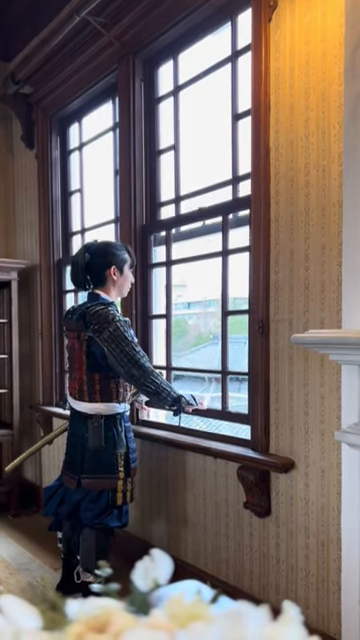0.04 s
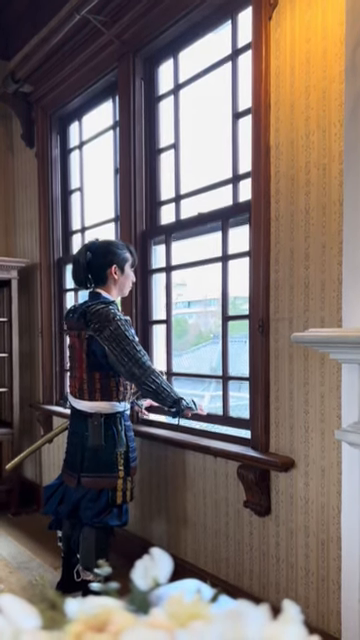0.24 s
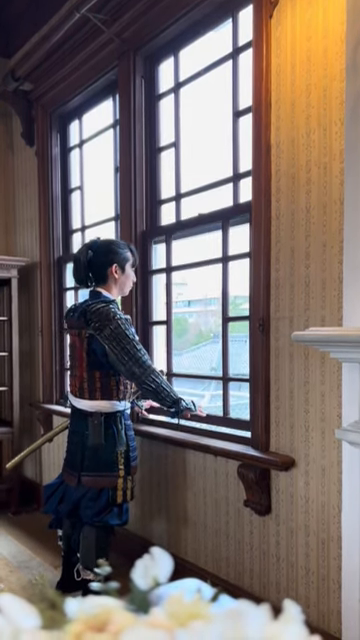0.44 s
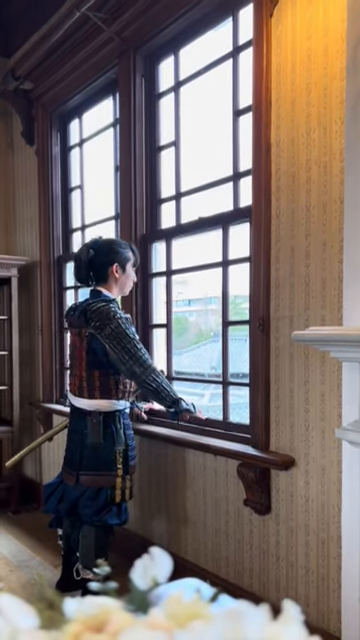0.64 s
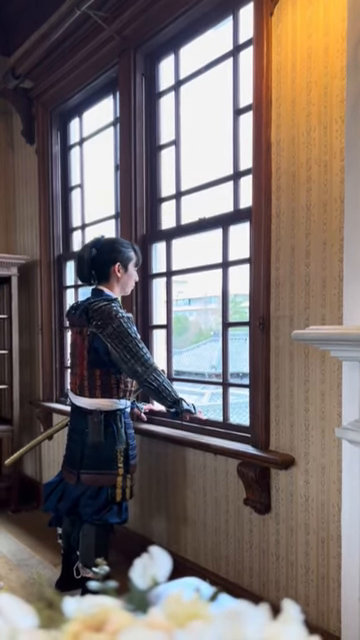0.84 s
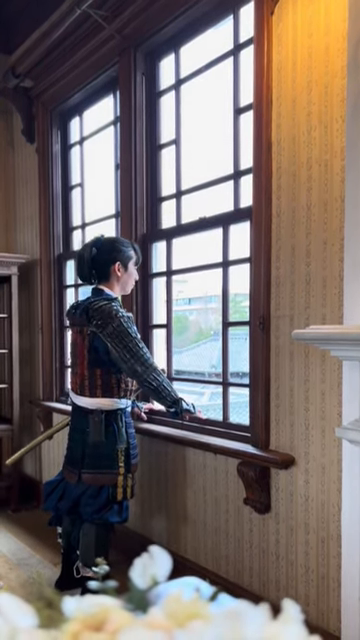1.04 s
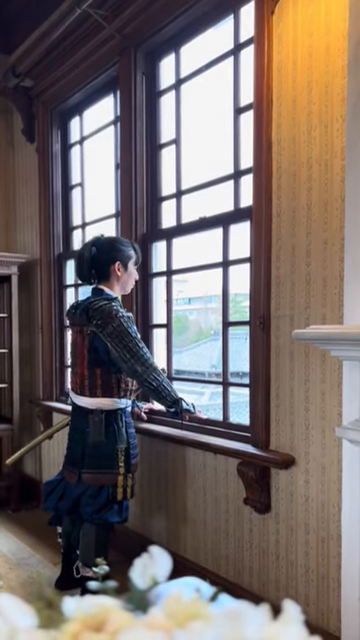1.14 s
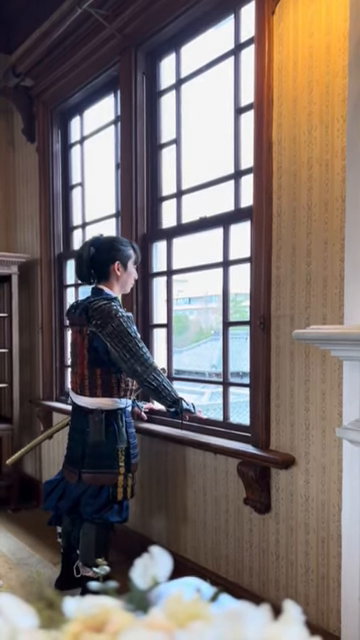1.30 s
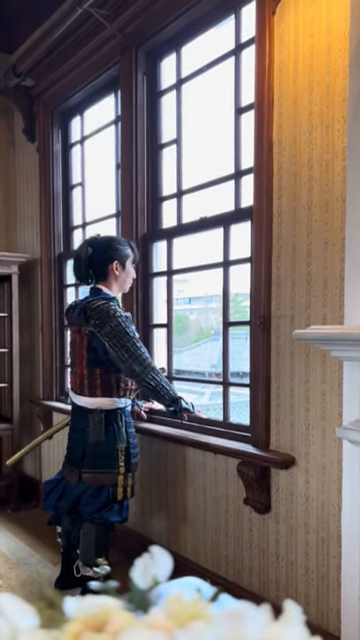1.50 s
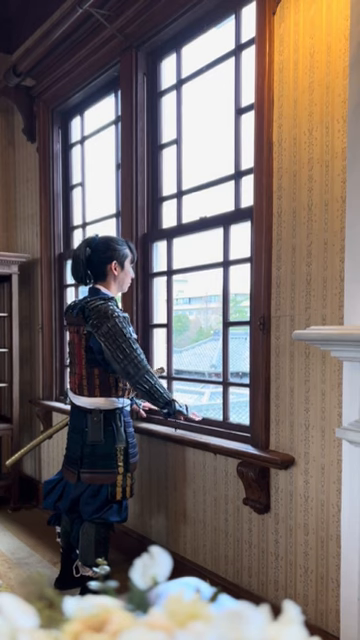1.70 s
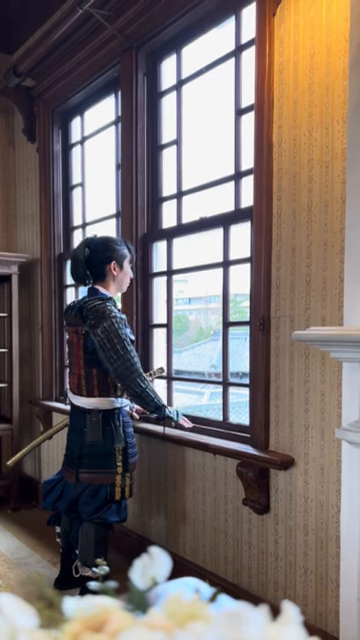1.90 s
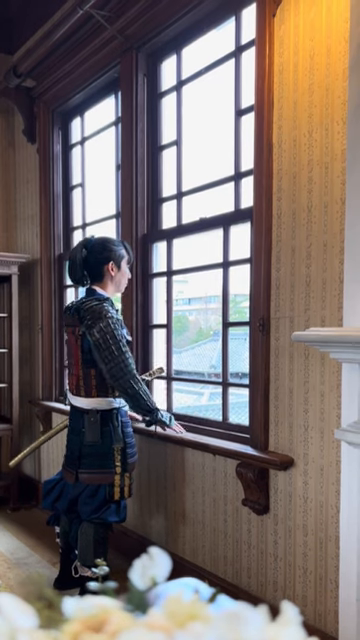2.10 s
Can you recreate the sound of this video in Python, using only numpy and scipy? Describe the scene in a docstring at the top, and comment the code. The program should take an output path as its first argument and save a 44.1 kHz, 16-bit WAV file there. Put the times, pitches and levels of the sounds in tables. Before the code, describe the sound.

A wooden sash window slides down with clacks and a rasping squeak, then thuds shut.

```python
"""Shutting a wooden sash window

In a quiet room the sash rumbles down its channel and clacks sideways against the frame. It binds, and
wood sticking and slipping on wood gives a rasping squeak. It lands with a low thud that sets sash, sill
and wall ringing. Then a hand lets go, a sleeve rustles and a bird chirps faintly outside."""
import sys
import numpy as np
from scipy import signal
from scipy.fft import rfft, irfft
from scipy.io import wavfile
from scipy.ndimage import uniform_filter1d

SR = 44100
rng = np.random.default_rng(int(sys.argv[2]) if len(sys.argv) > 2 else 0)


def store_wav(level_fs):
    """Save 16-bit WAV to argv[1]."""
    pcm = np.round(np.clip(np.atleast_2d(level_fs), -1, 1) * 32767)
    wavfile.write(sys.argv[1], SR, pcm.T.astype(np.int16))


N = 94815
T = np.arange(N) / SR
BIN_HZ = np.arange(N + 1) * SR / (2 * N) + 1
LEFT_RIGHT = np.array([[1], [-1]])

# stick-slip of the binding sash (time [s], pitch [Hz], level [dB], left minus right [dB])
STICK_SLIP = [(0.42, 856.2, -41.5, -7), (0.428, 780, -29, -8.5), (0.436, 825, -42, -4.0),
              (0.454, 837, -29, -4.5), (0.458, 773.6, -30, -3), (0.482, 784.4, -31.5, -7),
              (0.49, 725.7, -33.5, -16), (0.524, 731.7, -29, -6.0), (0.54, 760, -26, -6),
              (0.56, 756, -29, -2.5), (0.572, 821.6, -24.5, -4.5), (0.618, 802.2, -45.5, -4.0),
              (0.632, 873, -40, 4), (0.656, 827.4, -31.5, 5), (0.672, 846, -32.5, -2),
              (0.706, 838, -53, 4.5), (0.716, 876, -44.5, -3.5), (0.74, 849, -54.5, -2)]


def undb(db):
    return 10 ** (np.asarray(db) / 20)


def unit(x):
    return x / np.sqrt(np.mean(x ** 2) + 1e-20)


def noise():
    return rng.standard_normal(N)


def curve(rows, column=1):
    """One column of a table, joined by straight lines in time."""
    rows = np.array(rows)
    return np.interp(T, rows[:, 0], rows[:, column])


def at(points, hz):
    """A table over frequency, read on a log axis."""
    points = np.array(points)
    return np.interp(np.log(np.maximum(hz, 1)), np.log(points[:, 0]), points[:, 1])


def colour(x, spectrum):
    """Filter by a spectrum that falls steeply beyond its ends; rms 1."""
    low_cut = 1 + (spectrum[0][0] / BIN_HZ / 1.3) ** 6
    high_cut = 1 + (BIN_HZ / spectrum[-1][0] / 1.3) ** 6
    return unit(irfft(rfft(x, 2 * N) * undb(at(spectrum, BIN_HZ)) / low_cut / high_cut)[:N])


def walk(rate_hz):
    """Smooth random wandering; rms 1."""
    span = max(int(SR / rate_hz), 1)
    return unit(uniform_filter1d(uniform_filter1d(noise(), span), span))


def burst(start, rise, fall):
    """Smooth attack, then exponential decay; times in seconds."""
    age = np.maximum(T - start, 0)
    return np.sin(np.pi / 2 * np.minimum(age / rise, 1)) ** 2 * np.exp(-np.maximum(age - rise, 0) / fall)


def arch(start, length):
    return np.sin(np.pi * np.clip((T - start) / length, 0, 1))


def phase_of(hz):
    return 2 * np.pi * np.cumsum(hz) / SR


def grains(per_s, spread_db):
    """Random tiny slips of unequal size."""
    ticks = (rng.random(N) < per_s / SR) * np.sign(noise())
    return unit(ticks * undb(spread_db * np.clip(noise(), -2, 2)))


def spread(mid, side, hz):
    """Two close microphones: alike in the bass, unrelated well above 300 Hz."""
    width = hz ** 2 / (hz ** 2 + 300 ** 2)
    return (mid + width * side * LEFT_RIGHT) / np.sqrt(1 + width * width)


def diffuse(spectrum, width_at_hz):
    """Coloured noise from all round, as wide as the room is at one frequency."""
    return spread(colour(noise(), spectrum), colour(noise(), spectrum), width_at_hz)


def wide(mid, side, side_db=-7.5):
    """Grit from both sides of the frame, partly unlike left and right."""
    return mid + undb(side_db) * side * LEFT_RIGHT


def room_tone():
    """A faint, low bed of air that sways in level."""
    # still room (frequency [Hz], relative level [dB])
    spectrum = [(15, -57), (25, -27.5), (48, -11.5), (82, 4), (122, -18.5), (156, -11), (253, -27.5),
                (340, -26.5), (389, -49.5), (445, -34.5), (495, -49), (1450, -44), (15500, -56.5)]
    return diffuse(spectrum, width_at_hz=60) * undb(-61 + 2 * walk(12))


def room_tail():
    """Reverb in octave bands; the lows last longest, the bass below 85 Hz leaks away."""
    # room decay (frequency [Hz], t60 [s])
    decay = [(60, .9), (150, 0.54), (400, .62), (1000, 0.56), (3000, 0.53), (6000, 0.38), (14000, .24)]
    mid, side = rfft(noise(), 2 * N), rfft(noise(), 2 * N)
    out = 0
    for hz in 62.5 * 2 ** np.arange(9):
        band = np.cos(np.pi / 2 * np.clip(np.log2(BIN_HZ / hz), -1, 1)) ** 2 / (1 + (85 / BIN_HZ) ** 2)
        wash = spread(irfft(mid * band)[:N], irfft(side * band)[:N], hz)
        fade = burst(.0012, rise=.003, fall=at(decay, hz) / np.log(1000))
        out = out + wash * fade / np.sqrt(np.sum(fade ** 2))
    return out


def bird():
    """Faint arched, fluttering whistles from outside."""
    # chirps (time [s], length [s], pitch [Hz], pitch lift [Hz], level [dB])
    chirps = [(1.153, 0.095, 3300, 419, -75), (1.208, .045, 3310, 59.4, -80),
              (1.233, 0.045, 3405, 281, -80), (2.045, 0.12, 3410, 68, -72.5)]
    flutter_db, warble_hz = 1.5, 45.3
    out = 0
    for start, length, hz, lift, db in chirps:
        swell = arch(start, length)
        level = undb(db + flutter_db * walk(120)) * swell
        out = out + level * np.sin(phase_of(hz + lift * swell + warble_hz * walk(250)))
    return out


def sleeve():
    """The hand leaves the sash with a dull rub while the cloth swishes."""
    # hand rub (time [s], level [dB])
    rub_levels = [(1.60, -100), (1.64, -64.5), (1.70, -64.5), (1.755, -56.5), (1.79, -66), (1.86, -65.5),
                  (1.92, -74.5), (2.15, -87)]
    # dull skin on wood (frequency [Hz], relative level [dB])
    rub_spectrum = [(71, -29.5), (120, 5), (295, -1.5), (409, -1), (527, -15.5), (1210, -26), (1500, -30.5),
                    (1950, -59.5), (3300, -120)]
    # cloth strokes (time [s], length [s], level [dB])
    strokes = [(1.597, 0.23, -81.5), (1.776, 0.17, -73.5), (1.899, 0.28, -78)]
    # airy cloth (frequency [Hz], relative level [dB])
    cloth_spectrum = [(700, 3.5), (1500, -5), (2300, -2), (3200, -9), (4500, -1.5), (5400, -12), (7000, -8),
                      (9500, -20), (15000, -18.5)]
    rub = diffuse(rub_spectrum, width_at_hz=352) * undb(curve(rub_levels))
    swells = sum(undb(db) * arch(start, length) for start, length, db in strokes)
    return rub + diffuse(cloth_spectrum, width_at_hz=1500) * swells * undb(2.65 * walk(70))


def wall_boom():
    """After the landing, the wall's many low modes die away slowly."""
    # wall bass (frequency [Hz], relative level [dB])
    spectrum = [(30, -26.5), (42, -4.5), (55, 3.5), (72, -8), (95, 2.5), (135, -1.5), (220, -12),
                (400, -24), (900, -60.5)]
    return diffuse(spectrum, width_at_hz=50) * undb(-27.5) * burst(.797, rise=.03, fall=.13)


def slide():
    """The heavy sash rumbles and hisses along its channel."""
    # travel of the sash (time [s], rumble [dB], hiss [dB])
    travel = [(0, -39.5, -51.5), (.06, -42.5, -52.5), (.15, -46.5, -52.5), (.24, -39, -51.5),
              (.28, -31, -52.5), (.36, -35, -53), (.45, -40.5, -45.5), (.56, -47, -47), (.68, -55, -53),
              (.73, -36.5, -49), (.78, -42, -48), (.84, -83, -81)]
    # weight of the sash (frequency [Hz], relative level [dB])
    rumble_spectrum = [(15, -41), (25, -14.5), (42, 2), (65, 4.5), (130, 0), (167, 2.5), (291, -3),
                       (379, -7), (448, -21), (552, -24), (600, -12), (635, -18.5), (700, -20),
                       (910, -43.5), (1540, -120)]
    # channel friction (frequency [Hz], relative level [dB])
    hiss_spectrum = [(240, -30.5), (400, -2.5), (425, 0), (894, -6), (979, -11), (1690, -11.5), (1820, -15),
                     (3150, -21.5), (4810, -23.5), (15000, -48.5)]
    rumble = diffuse(rumble_spectrum, width_at_hz=79.5) * undb(curve(travel))
    hiss = diffuse(hiss_spectrum, width_at_hz=930) * undb(curve(travel, column=2) + .44 * walk(40))
    return rumble + hiss


def frame_ring(drive):
    """The bright resonances of frame and panes; white noise keeps its level."""
    # frame and pane modes (frequency [Hz], bandwidth [Hz], relative level [dB])
    modes = [(1097, 75, -3.5), (1327, 10, 0), (1800, 34, 3.5), (2236, 40, -5), (2784, 10, -1),
             (3460, 13, -3.5), (3520, 14, 5.5), (4036, 30, 3.5), (4370, 8.3, -3.5), (4870, 40, -4),
             (5460, 29, -6.5), (5800, 47, -8.5), (7220, 130, -5.5), (8410, 92, -9.5), (11410, 190, -13.5)]
    power = sum(undb(db) ** 2 * np.pi * width / SR for _, width, db in modes)
    ring = sum(undb(db) * signal.lfilter(*signal.iirpeak(hz, hz / width, SR), drive)
               for hz, width, db in modes)
    return ring / np.sqrt(power)


def clacks():
    """Each knock is a gritty crack that rings the frame, then a close pair of short wooden tones."""
    # sideways knocks (time [s], crack [dB], treble [dB], ring pitch [Hz], ring [dB], crack decay [s])
    knocks = [(0.2541, -30.5, 1.5, 1222, -28, .007), (0.2692, -36, 2, 1225, -40.5, 0.012),
              (0.299, -27.5, -0.5, 872.3, -25.5, .009), (.3175, -36, 0.5, 833, -30, 0.0062),
              (0.371, -44, -1.5, 860, -35.5, 0.015), (0.409, -28.5, -4, 888, -31.5, 0.014),
              (0.439, -34.5, -3.5, 626, -34.5, .018)]
    # crack of wood (frequency [Hz], relative level [dB])
    spectrum = [(600, -14), (1000, -5), (1600, -0.5), (1950, -4), (2350, 1.5), (2750, -2), (3000, -8.5),
                (3600, -2), (3900, -4.5), (4400, -2.5), (5000, -11), (5700, -2), (6500, -9), (7200, -6),
                (8000, -10.5), (8600, -11), (10500, -17), (11500, -13.5), (13000, -23.5), (15500, -19.5)]
    ring_delay_s, ring_rise_s, detune, ring_pan_db = .003, .005, .06, -7
    rings = envelope = treble_envelope = 0
    for start, db, treble_db, hz, ring_db, decay in knocks:
        blow = undb(db) * burst(start, rise=.0025, fall=decay)
        envelope = envelope + blow
        treble_envelope = treble_envelope + blow * undb(treble_db)
        onset = start + ring_delay_s
        pair = sum(np.sin(2 * np.pi * hz * (1 + k * detune) * (T - onset - ring_rise_s)) for k in (-1, 1))
        rings = rings + undb(ring_db) * pair * burst(onset, ring_rise_s, fall=.01)

    def crack():
        grit = colour(grains(per_s=12000, spread_db=1.5), spectrum)
        low = signal.sosfiltfilt(signal.butter(2, 6000, fs=SR, output="sos"), grit)
        return envelope * low + treble_envelope * (grit - low) + undb(-8) * frame_ring(envelope * noise())
    return rings * undb(ring_pan_db * LEFT_RIGHT / 2) + wide(crack(), crack())


def rasp(slip_phase):
    """One sharp slip per squeak cycle, with loose grit between, rings the frame."""
    # pressure of the rasp (time [s], level [dB])
    levels = [(.41, -55), (.42, -41.5), (.455, -36.5), (.49, -40), (.52, -43), (.555, -39), (.60, -44.5),
              (.625, -50), (.66, -62.5), (.72, -62), (.77, -72)]
    # wood scraping wood (frequency [Hz], relative level [dB])
    spectrum = [(400, -4), (600, 6), (800, -5), (1100, 6.5), (1350, -10.5), (1650, -10), (1950, -2),
                (2350, -5.5), (2750, -3), (3050, -5.5), (3500, 1), (4200, 0), (5300, -4.5), (6500, -10.5),
                (8000, -19.5), (11500, -23), (12800, -38.5), (15500, -45)]
    cycle_starts = np.diff(np.floor(slip_phase / (2 * np.pi)), prepend=0)
    pulses = unit(cycle_starts * undb(3 * walk(900)))
    slips = undb(-8.5) * (pulses - pulses.mean())

    def scrape():
        grit = (grains(per_s=1200, spread_db=.5) + noise()) / 2
        friction = (slips + grit) * undb(2 * walk(110))
        return colour(friction, spectrum) + undb(-14.5) * frame_ring(unit(friction))
    gate = (T > levels[0][0]) * (T < levels[-1][0])
    return wide(scrape(), scrape()) * undb(curve(levels)) * gate


def squeals():
    """Thin squeals break out as the bind eases."""
    # high squeals (time [s], length [s], pitch [Hz], level [dB])
    notes = [(0.576, .035, 4254, -40), (0.612, 0.044, 4293, -43.5), (.642, 0.027, 6000, -54)]
    return sum(undb(db) * arch(start, length) * np.sin(phase_of(hz * (1 + .006 * walk(200))))
               for start, length, hz, db in notes)


def screech():
    """At the tightest bind, alternate strong and weak slips stack overtones half the pitch apart."""
    glide_hz = uniform_filter1d(curve(STICK_SLIP), SR // 40)
    phase = phase_of(glide_hz * (1 + .003 * walk(200)))
    stack = 0
    for k in range(3, 16):
        level = undb(-6 * (k % 2) + 3 * walk(48))  # half multiples sit lower
        stack = stack + level * np.sin(k * phase / 2 + rng.uniform(0, 2 * np.pi))
    return unit(stack) * undb(-38) * arch(start=.509, length=.12)


def squeak(slip_phase):
    """The binding sash sticks and slips; alternate strong and weak slips add half multiples."""
    # squeak partials (multiple of the pitch [ratio], relative level [dB])
    partials = [(.5, -21), (1.5, -21.5), (2, -19.5), (3, -21.5)]
    tone = np.sin(slip_phase)
    for multiple, db in partials:
        tone = tone + undb(db + 3 * walk(97)) * np.sin(multiple * slip_phase)
    flutter = undb(2 * walk(160))
    fade_in = np.clip((T - STICK_SLIP[0][0]) / .0044 + 1, 0, 1)
    fade_out = np.clip((STICK_SLIP[-1][0] - T) / .02 + 1, 0, 1)
    return unit(tone * flutter) * undb(curve(STICK_SLIP, column=2) - 1) * fade_in * fade_out


def thuds():
    """A soft push spreads through sash and sill and rings them; the wood faces meet with a dull click."""
    # blows on sash and sill (time [s], body [dB], click [dB], push length [s])
    blows = [(.195, -21.5, -75, .0025), (.7775, -8.5, -32.5, 0.0024), (0.794, -18, -39, 0.0019),
             (.812, -15.5, -46, 0.0032), (.898, -31.5, -57.5, 0.0036), (1.275, -52, -95, 0.013),
             (1.538, -51.5, -95, .006), (1.634, -62, -64.5, 0.0019)]
    # sash and sill modes (frequency [Hz], relative level [dB], t60 [s])
    modes = [(63.8, -27.5, 0.7), (102.6, -12, 1), (148.73, -7.5, 0.26), (176, -1, 0.036), (205, -8.5, .06),
             (231.7, -10.5, 0.1), (272, -10.5, 0.49), (326.6, -9, 0.43), (388.1, -14.5, .3),
             (456.6, -17.5, .2), (528, -18, 0.1), (602, -14.5, 0.26), (850, -17.5, .1), (1340, -23, .08)]
    # wood meeting wood (frequency [Hz], relative level [dB])
    click_spectrum = [(150, -2), (400, 9.5), (600, 5.5), (900, 4.5), (1150, -2.5), (1350, -2),
                      (1700, -10.5), (2300, -9.5), (3100, -21), (4300, -22.5), (6000, -23.5), (8000, -30),
                      (11000, -39.5), (15000, -45)]
    build_s, click_rise_s = .008, .0069
    body = sum(undb(db) * np.sin(2 * np.pi * hz * (T - build_s)) * burst(0, build_s, t60 / np.log(1000))
               for hz, db, t60 in modes)
    body = body / np.abs(body).max()
    out = 0
    for time, body_db, click_db, length in blows:
        push = arch(time, length) ** 2
        thud = signal.fftconvolve(push / push.sum(), body)[:N]
        contact = burst(time - click_rise_s, click_rise_s, fall=.014)
        click = diffuse(click_spectrum, width_at_hz=400) * contact
        out = out + undb(body_db) * thud + undb(click_db) * click
    return out


def scene():
    """Squeak, knocks, rasp and bird feed the reverb; the diffuse layers lie beneath them."""
    tail = room_tail()

    def in_room(x, wet_db):
        return x + undb(wet_db) * signal.fftconvolve(np.atleast_2d(x), tail, axes=1)[:, :N]
    slip_phase = phase_of(curve(STICK_SLIP) * (1 + .02 * walk(300)))  # locks the rasp to the squeak
    squeak_pan = undb(curve(STICK_SLIP, column=3) * LEFT_RIGHT / 2)
    out = in_room(squeak(slip_phase), wet_db=-5) * squeak_pan
    out += in_room(clacks(), wet_db=-3.5)
    out += in_room(rasp(slip_phase) + squeals() + screech(), wet_db=-6)
    out += in_room(thuds(), wet_db=-1)
    out += in_room(bird(), wet_db=-1)
    return out + slide() + wall_boom() + sleeve() + room_tone()


def record(dry):
    """The two close microphones hear the same bass; the recorder cuts the deepest rumble and the top."""
    mono_below_hz, low_cut_hz, top_hz = 230, 32, 15900
    mid, side = (dry[0] + dry[1]) / 2, (dry[0] - dry[1]) / 2
    side = signal.sosfiltfilt(signal.butter(1, mono_below_hz, "high", fs=SR, output="sos"), side)
    mid = signal.sosfilt(signal.butter(2, low_cut_hz, "high", fs=SR, output="sos"), mid)
    return signal.sosfilt(signal.ellip(8, .2, 70, top_hz, fs=SR, output="sos"), mid + side * LEFT_RIGHT)


dry = scene()
out = record(dry)
store_wav(out)
```